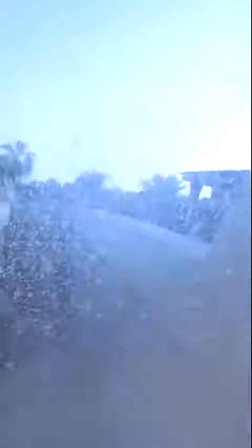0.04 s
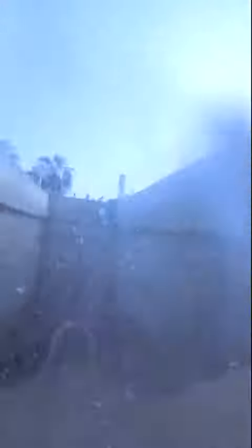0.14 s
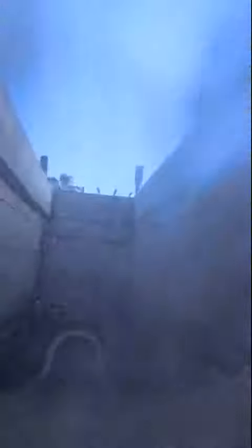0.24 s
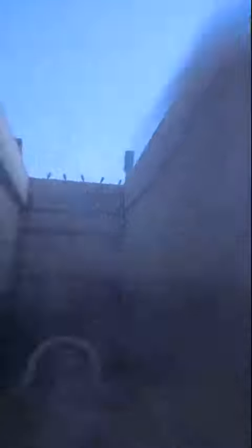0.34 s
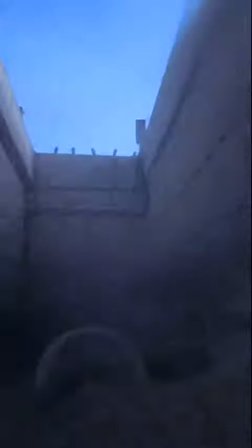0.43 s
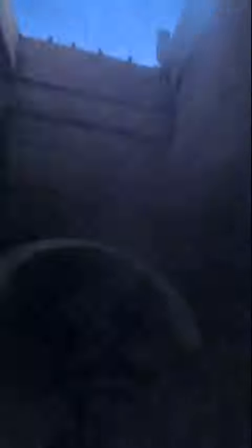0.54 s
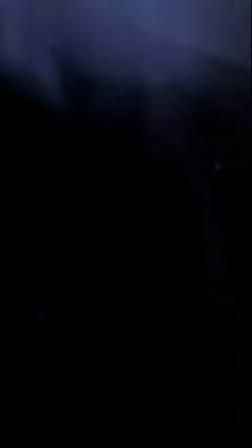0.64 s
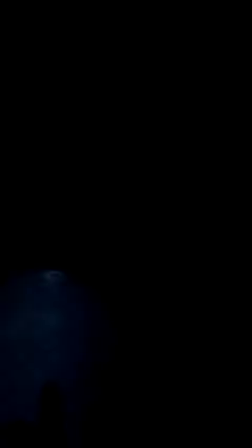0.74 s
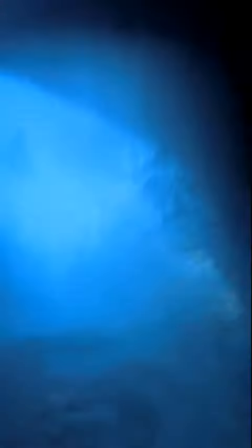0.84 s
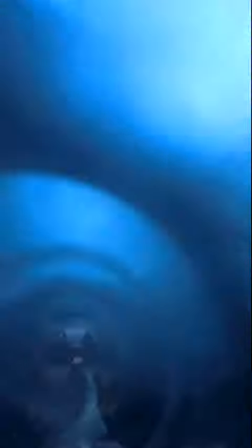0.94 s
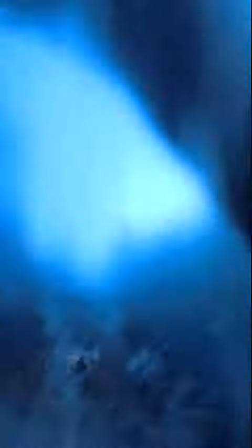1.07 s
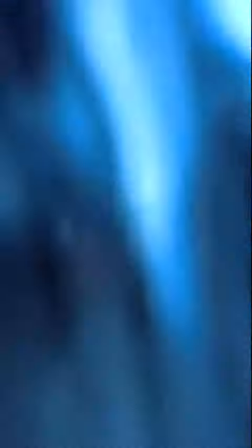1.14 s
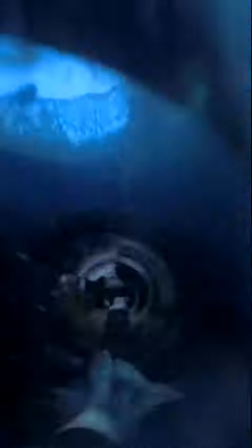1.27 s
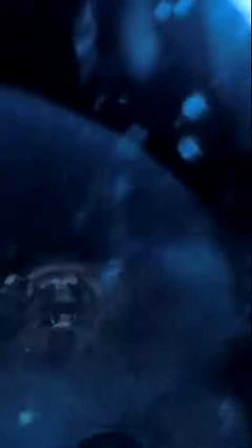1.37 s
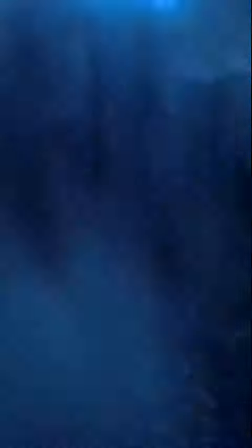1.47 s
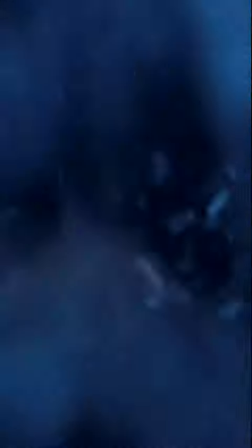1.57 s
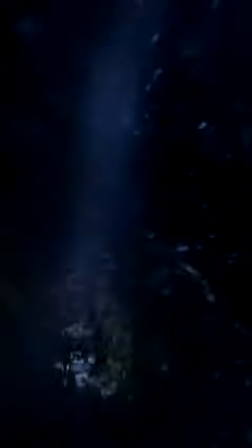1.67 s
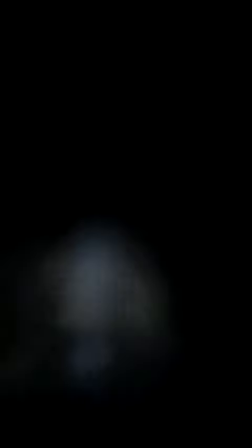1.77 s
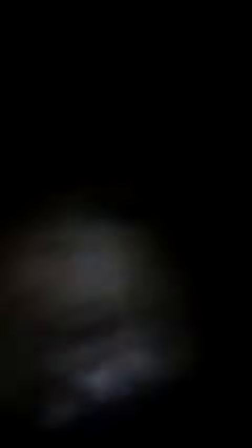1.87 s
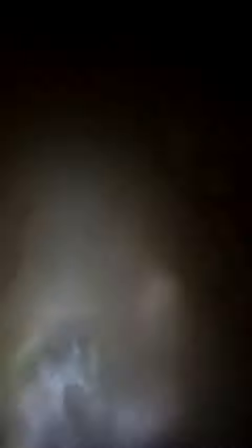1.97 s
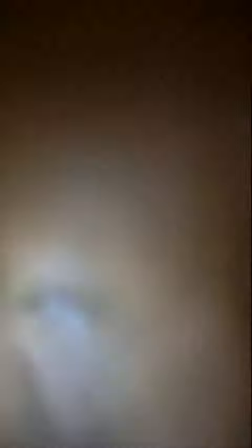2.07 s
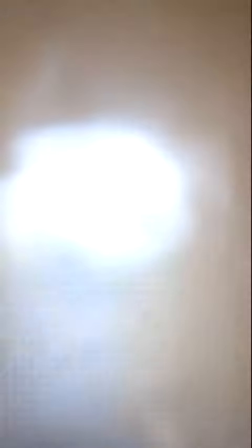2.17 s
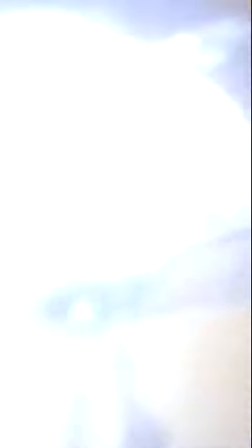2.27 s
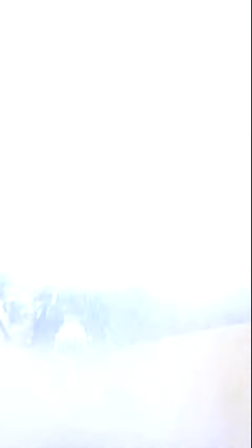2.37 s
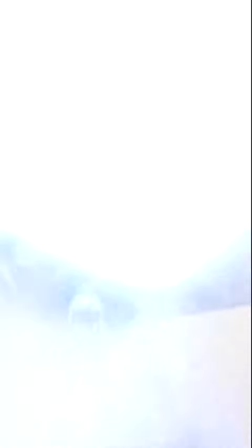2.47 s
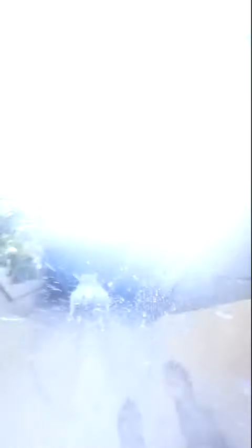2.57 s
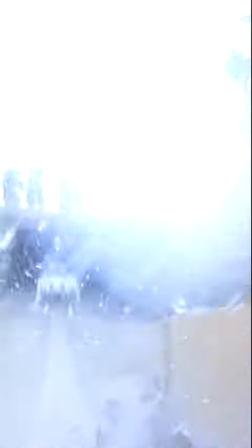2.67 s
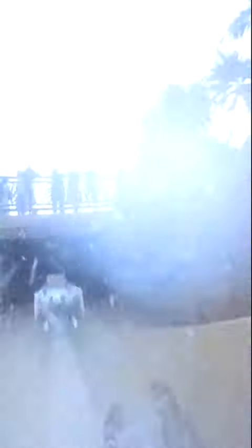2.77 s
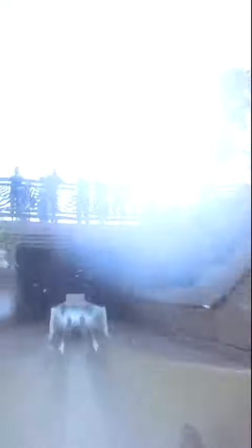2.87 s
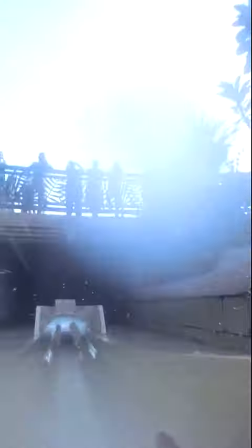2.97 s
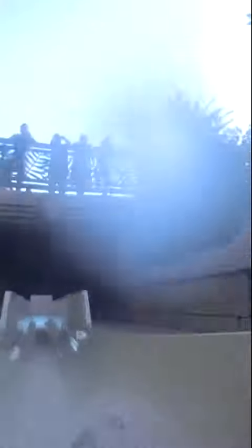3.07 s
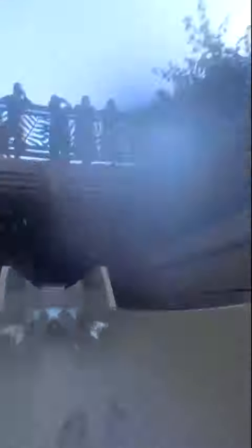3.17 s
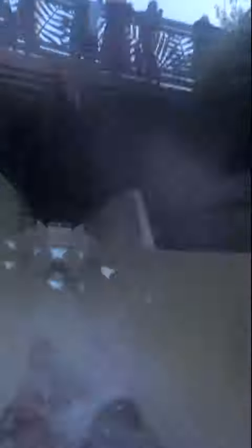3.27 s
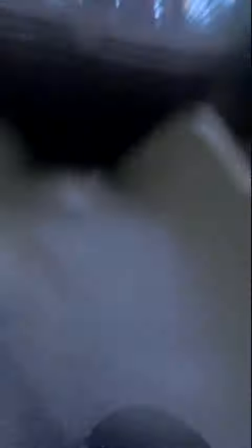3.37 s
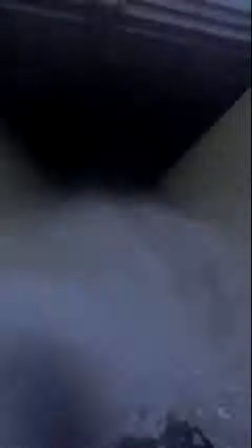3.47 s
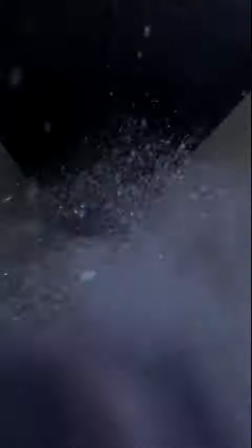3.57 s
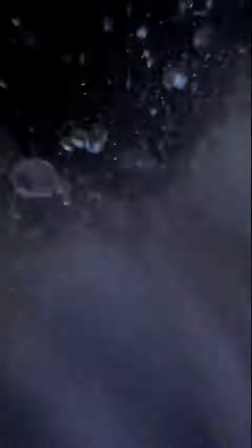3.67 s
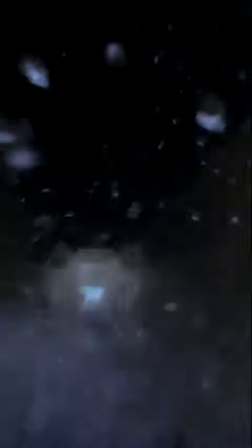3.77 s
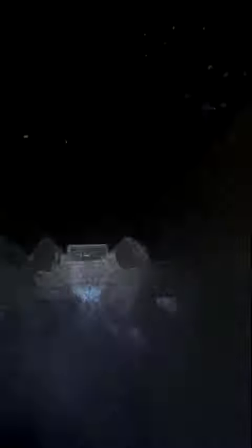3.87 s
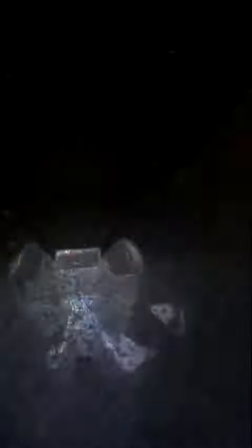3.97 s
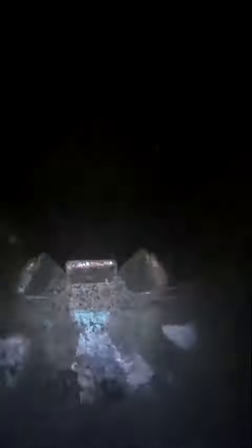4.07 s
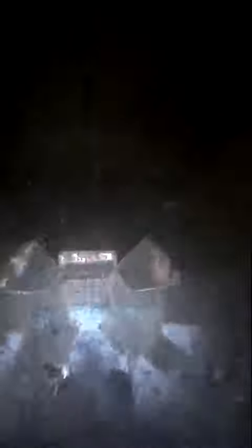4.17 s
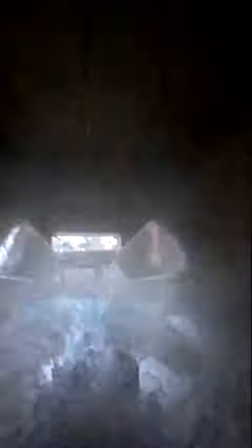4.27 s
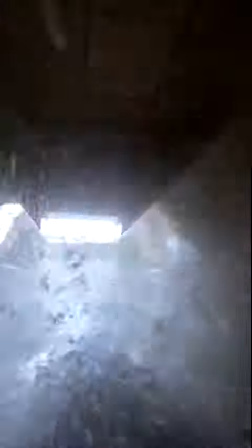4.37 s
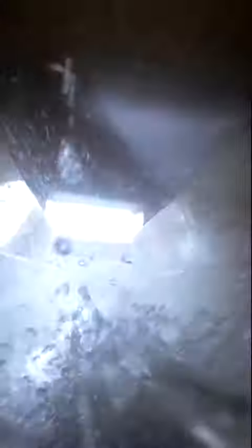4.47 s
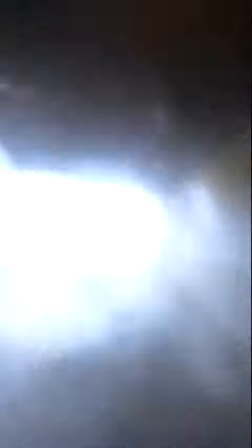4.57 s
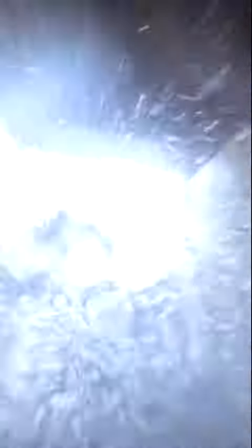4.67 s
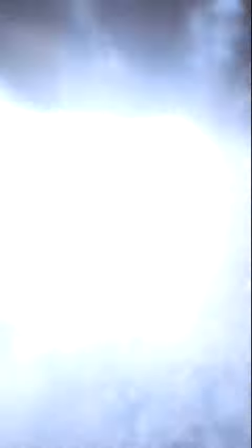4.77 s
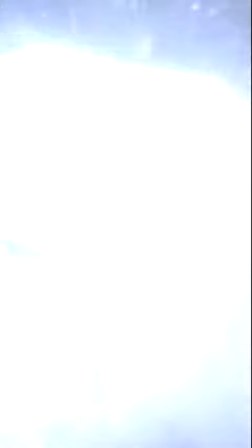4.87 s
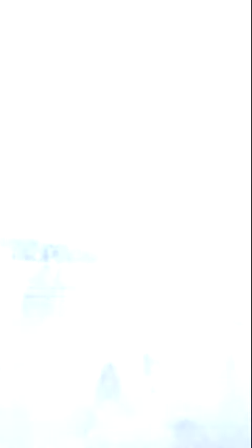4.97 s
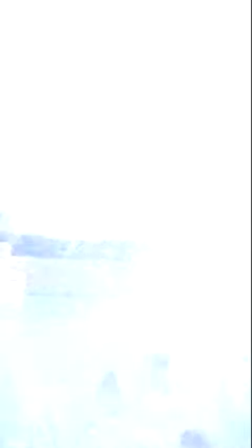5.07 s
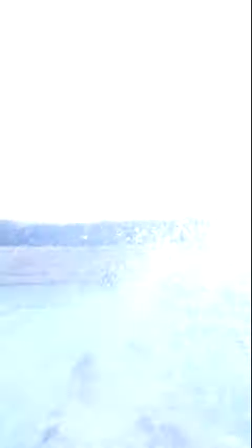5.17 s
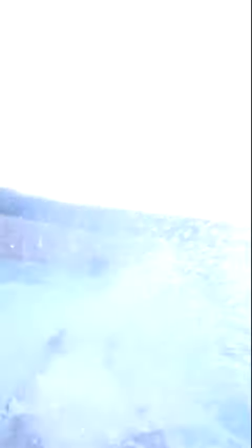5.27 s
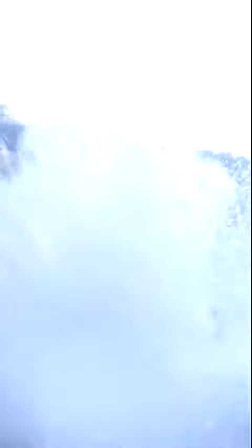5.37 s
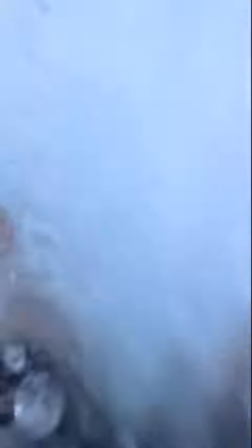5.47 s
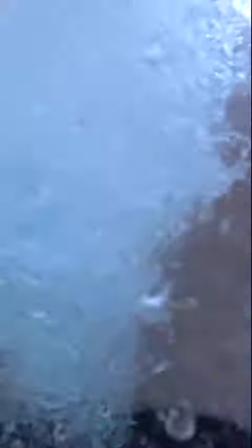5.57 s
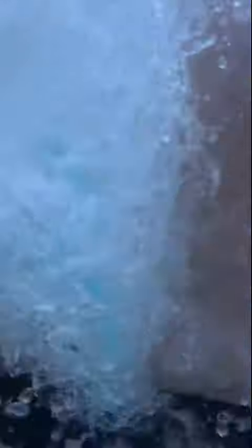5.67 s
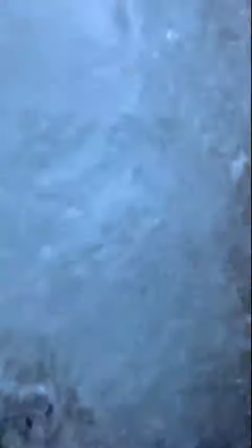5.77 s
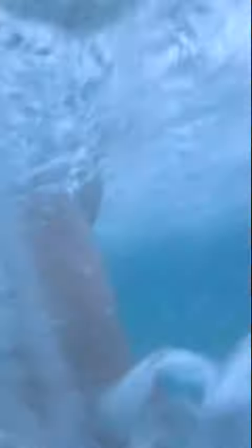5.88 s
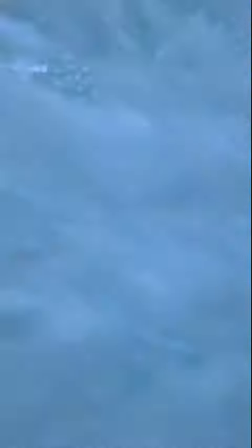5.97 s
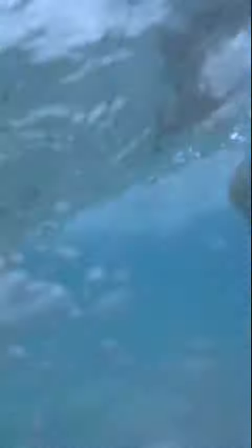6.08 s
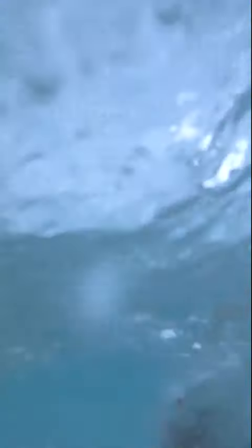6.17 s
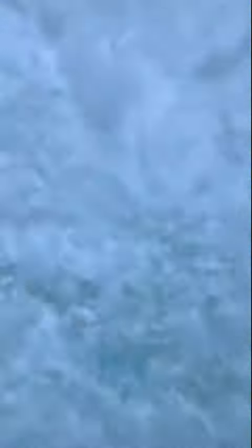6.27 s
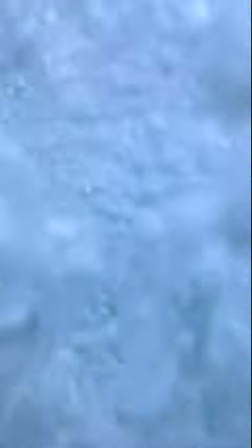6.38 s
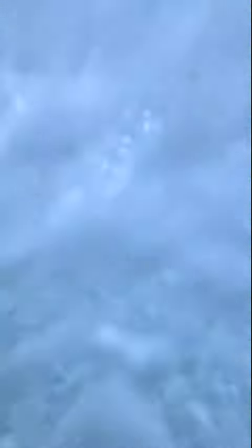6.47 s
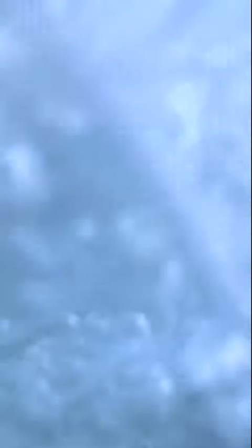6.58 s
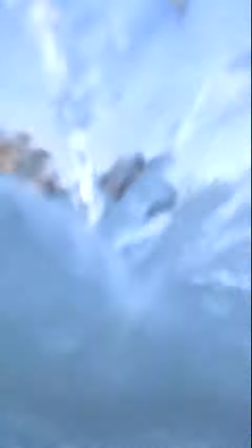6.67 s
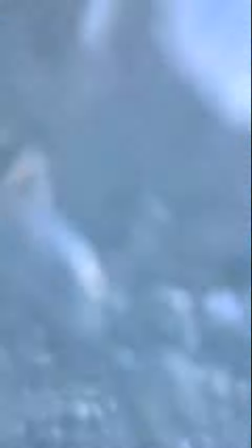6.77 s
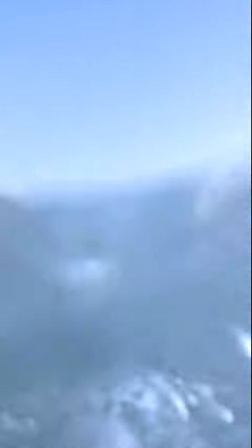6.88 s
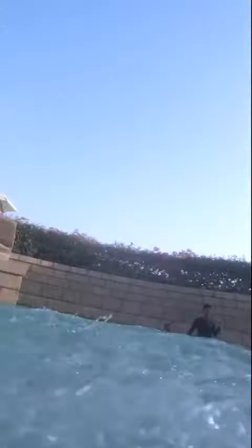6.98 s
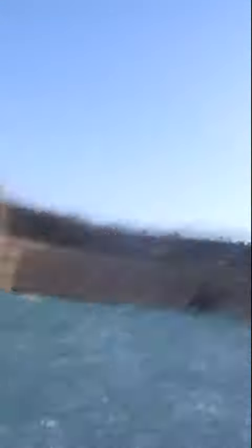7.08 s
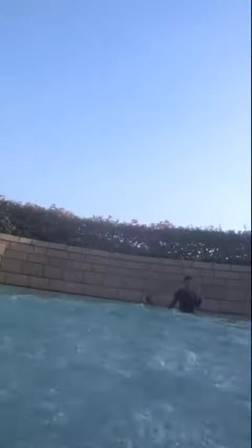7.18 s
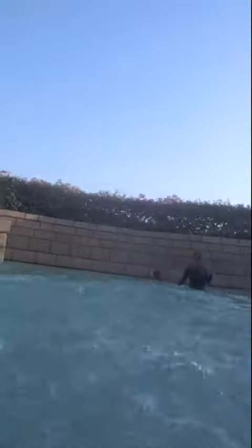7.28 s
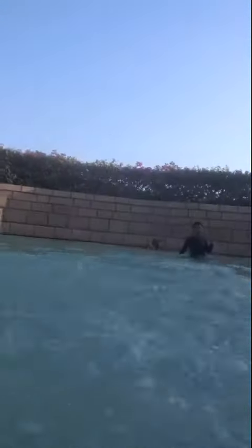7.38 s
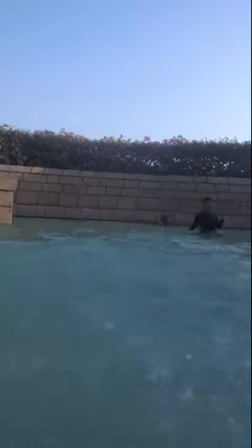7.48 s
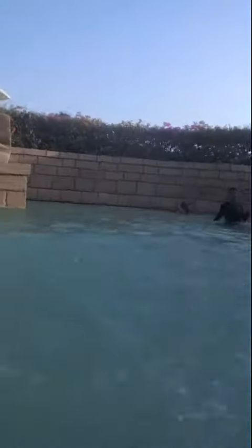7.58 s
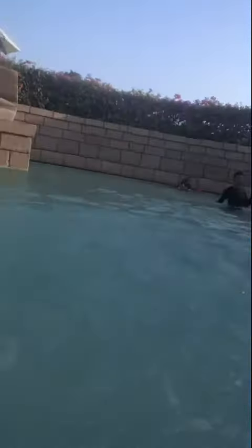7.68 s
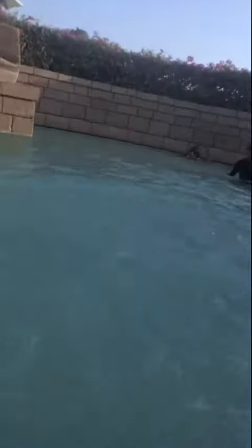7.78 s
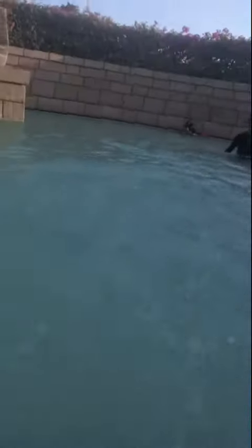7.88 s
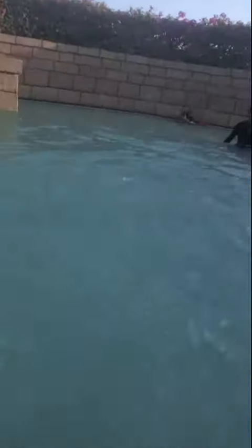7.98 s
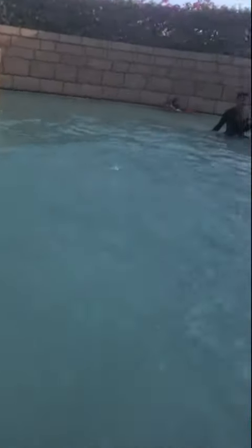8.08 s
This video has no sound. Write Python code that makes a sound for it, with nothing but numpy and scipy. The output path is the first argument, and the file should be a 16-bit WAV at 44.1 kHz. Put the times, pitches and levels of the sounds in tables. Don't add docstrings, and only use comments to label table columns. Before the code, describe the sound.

Very close, a cased phone microphone is pelted by water on a fast slide: roaring rush, hissing spray, dull thumps and sharp ticks in uneven bursts. The water eases on a flatter stretch, though big drops still knock. Then a splash cuts into booming, gurgling bubbles underwater, fading until the phone surfaces to very quiet lapping, fizz and small plops.

```python
import sys
import numpy as np
from scipy import signal
from scipy.fft import rfft, irfft, next_fast_len
from scipy.io import wavfile
from scipy.ndimage import map_coordinates

SR = 44100
rng = np.random.default_rng(int(sys.argv[2]) if len(sys.argv) > 2 else 0)


def unload_wav(signal):
    wavfile.write(
        sys.argv[1],
        SR,
        np.round(np.clip(np.atleast_2d(signal).T, -1, 1) * 32767).astype(np.int16),
    )


def volts_from_db(level):
    exponent = np.asarray(level, float) / 20
    return 10 ** exponent


N = 358091


def unit(x):
    return x / np.sqrt(np.mean(x ** 2) + 1e-20)


def curves(rows):
    s, *columns = np.transpose(rows)
    t = np.arange(N) / SR
    return [np.interp(t, s, column, left=-150, right=-150) for column in columns]


def wobble(rate):
    knots = rng.standard_normal(int(N * rate / SR) + 4)
    return map_coordinates(knots, [np.arange(N) * rate / SR])


def coloured(x, spectrum):
    pitch_hz, level_db = np.transpose(spectrum)
    hz = np.fft.rfftfreq(8192, 1 / SR)
    gain = volts_from_db(np.interp(np.log(hz + 1), np.log(pitch_hz), level_db))
    cepstrum = irfft(np.log(gain))
    cepstrum[1:4096] *= 2
    cepstrum[4097:] = 0
    return signal.fftconvolve(x, irfft(np.exp(rfft(cepstrum))))[:N]


def rings(s, size, hz, cycles, attack, glide, count):
    t = np.arange(count) / SR
    turns = hz[:, None] * t
    bend = turns * (1 + glide * np.tanh(turns / 2))
    fade = np.exp(-turns / cycles) * (1 - np.exp(-turns / attack))
    shape = np.cos(2 * np.pi * bend) * fade
    at = np.round(s * SR).astype(int)[:, None] + np.arange(count)
    return np.bincount(at.ravel(), (size[:, None] * shape).ravel(), N + count + SR)[:N]


def droplets(count, spread_db):
    row = rng.random((count, 2))
    excess = np.minimum(-np.log(1 - row[:, 1]), 4)
    return unit(np.bincount((row[:, 0] * N).astype(int), volts_from_db(spread_db * excess), N))


def shower(spectrum, drops, share, lumpy_db, lump_rate):
    noise = volts_from_db(lumpy_db * wobble(lump_rate)) * rng.standard_normal(N)
    share = np.clip(share, 0, 1)
    mix = np.sqrt(share) * unit(drops) + np.sqrt(1 - share) * unit(noise)
    return unit(coloured(mix, spectrum))


def bubbles(count, mid_hz, spread, cycles, spread_db, size):
    row, pitch = rng.random((count, 2)), rng.standard_normal(count)
    hz = np.clip(mid_hz * np.exp(spread * pitch), 40, 12000)
    excess = np.minimum(-np.log(1 - row[:, 1]), 4)
    loudness = volts_from_db(spread_db * excess)
    return unit(rings(row[:, 0] * N / SR, loudness, hz, cycles, attack=0.34, glide=0.062, count=size))


def strays(level_db, count, spread_db):
    calm_from_s = 5.45
    row = rng.random((count, 2))
    odds = np.cumsum(volts_from_db(0.6 * level_db) * (np.arange(N) < calm_from_s * SR))
    at = np.interp(row[:, 0] * odds[-1], odds, np.arange(N)).astype(int)
    return at / SR, level_db[at] + spread_db * np.minimum(-np.log(1 - row[:, 1]), 3)


# [start_s, spray_db on the membrane, drumming_db on the case]
SLIDE_WATER = [(0, -30, -31), (.15, -36.5, -38), (.41, -40, -43), (.64, -38.5, -37.5), (.81, -28, -37.5),
               (1.12, -29, -27), (1.4, -35, -30), (1.7, -39, -31.5), (2.16, -39.5, -37), (2.44, -35, -38.5),
               (2.77, -44.5, -41), (3.1, -49.5, -51.5), (3.27, -36, -45), (3.66, -47, -38.5),
               (3.76, -38, -34), (3.95, -38, -38), (4.35, -40, -40), (4.92, -41, -34), (5.27, -42, -43),
               (5.73, -41.5, -44)]
# [start_s, spray_db, drumming_db]
POOL_ENTRY = [
    (5.81, -31, -27),
    (5.855, -26.5, -33.5),
    (5.875, -30, -41),
    (5.9, -51, -39),
    (5.93, -55, -38.5),
]
# [middle_s, change_db, length_s]
SPRAY_SHEETS = [(1.257, 7, .04), (1.212, -4, .025), (1.397, -8, .022), (1.419, 12, .01), (1.436, 3, .015),
                (1.484, 16, .03), (1.596, 7, .05), (1.897, 4, .08), (2.085, 9, .05), (2.6, -4, .06),
                (2.894, 4.5, .06), (3.577, 4, .03), (3.629, -3, .03), (3.688, -5, .035), (4.429, 2, .05),
                (4.551, -2.5, .06), (4.694, 3, .04), (5.836, 2, 0.0047), (5.862, 16, 0.0027)]


def water_levels():
    spray_db, drum_db = curves(SLIDE_WATER + POOL_ENTRY)
    t = np.arange(N) / SR
    sheets_db = sum(db * np.exp(-((t - s) / length) ** 2) for s, db, length in SPRAY_SHEETS)
    return spray_db + sheets_db, drum_db + 0.34 * sheets_db


# [start_s, buffet_db]
AIR_RUSH = [
    (0, -36.5),
    (.41, -43),
    (.85, -30),
    (1.5, -43),
    (2.2, -38.5),
    (2.45, -58),
    (4.3, -53),
    (5.72, -54),
    (5.81, -33),
]
# [pitch_hz, level_db]
BUFFET_TONE = [(20, -20), (45, -5.5), (95, -1.5), (150, -8.5), (300, -43), (1000, -100)]
# [pitch_hz, level_db]
RUMBLE_TONE = [(60, -14), (150, -1.5), (260, 0.5), (450, -4), (900, -12.5), (2000, -28.5), (6000, -107.5)]
# [pitch_hz, level_db]
PATTER_TONE = [(150, -4.5), (400, -4), (700, -0.5), (1500, -3.5), (2600, -5), (3700, -18), (5000, -36),
               (9000, -41.5)]
# [pitch_hz, level_db]
PORT_TONE = [(2500, -11), (4000, -6.5), (5200, -2.5), (6500, 4.5), (7700, 4), (10400, -1.5), (12000, -12),
             (15500, -22.5)]


def ride(spray_db, drum_db):
    mean_spray_db = -34.5
    hiss_db = mean_spray_db + 0.92 * (spray_db - mean_spray_db) - 2.5
    buffet_db, = curves(AIR_RUSH + [(5.93, -23)])
    surge = wobble(30)
    spray = droplets(count=4000, spread_db=4.5)
    specks = bubbles(count=2500, mid_hz=3190, spread=0.47, cycles=1.0, spread_db=2.5, size=150)
    gusts = droplets(count=300, spread_db=1.5)
    buffet = shower(BUFFET_TONE, gusts, share=0.38, lumpy_db=5, lump_rate=10)
    drumming = droplets(count=1500, spread_db=2.5)
    rumble = shower(RUMBLE_TONE, drumming, share=0.35, lumpy_db=3, lump_rate=40)
    membrane_drops = spray + 0.7 * droplets(count=2000, spread_db=4)
    patter = shower(PATTER_TONE, membrane_drops, share=0.6, lumpy_db=3, lump_rate=60)
    port_drops = spray + 0.7 * droplets(count=3000, spread_db=4)
    hiss = shower(PORT_TONE, port_drops, share=0.6, lumpy_db=1.8, lump_rate=90)
    low = volts_from_db(buffet_db) * buffet + volts_from_db(drum_db + 1.4 * surge) * rumble
    high = volts_from_db(spray_db - 2.5) * (patter + 0.34 * specks) + volts_from_db(hiss_db - 0.5) * hiss
    return low + volts_from_db(1.2 * surge) * high


# [start_s, peak_db, membrane pitch_hz, port_ring_db]
MEMBRANE_DROPS = [(0.012, -11, 210, -11.5), (0.0357, -12.5, 338, -30), (0.0745, -4.5, 359, -10.5),
                  (0.1093, -14.5, 195, -12), (0.133, -10, 302, -14), (.2372, -4, 337, -5),
                  (0.3392, -19, 223, -7), (0.4701, -18.5, 443, -12), (0.6874, -19.5, 123, -31),
                  (.878, -14, 320, -4.5), (1.052, -14, 395, -3), (1.102, -5.5, 485, -11.5),
                  (1.1135, -10.5, 156, -3), (1.1195, -3, 365, -5), (1.15, -14.5, 258, -7.5),
                  (1.365, -9, 440, -16), (1.42, -11, 334, -17), (1.464, -9, 284, -9.5),
                  (1.4765, -6.5, 397, -15.5), (1.483, -2.5, 291, -9), (1.4954, -2.5, 467, -4),
                  (1.5218, -8, 340, -16), (1.5355, -11.5, 196, -24.5), (1.575, -14, 256, -21),
                  (1.5968, -17, 170, -19.5), (1.7604, -18.5, 194, -31), (2.015, -14.5, 240, -25.5),
                  (2.0225, -11, 189, -33), (2.0747, -8.5, 423, -24), (2.1374, -13.5, 276, -10.5),
                  (2.6926, -23.5, 252, -31), (2.8781, -5.5, 310, -12.5), (2.9849, -20.5, 370, -16.5),
              (3.3032, -8, 215, -10), (3.3181, -16, 403, -10.5), (3.3758, -19, 320, -19),
              (3.5839, -6, 216, -3.5), (3.601, -10.5, 186, -23), (3.741, -7.5, 124, -15),
              (3.774, -15.5, 213, -10), (3.8075, -6.5, 128, -24), (3.8211, -7, 171, -15.5),
              (4.0242, -13, 290, -27), (4.065, -18, 171, -15), (4.1682, -18.5, 388, -17.5),
              (4.1832, -15, 332, -16), (4.22, -10, 297, -13.5), (4.277, -11, 182, -19.5),
              (4.4125, -10.5, 324, -17), (4.4384, -10, 292, -15.5), (4.6851, -7, 177, -24.5),
              (4.6975, -7, 246, -15), (4.7578, -12, 338, -8.5), (4.794, -13, 155, -34),
              (4.8015, -9, 237, -13), (4.912, -15, 325, -20), (5.0444, -12.5, 297, -12),
              (5.1284, -17.5, 370, -21.5), (5.393, -17.5, 296, -27), (5.4299, -9, 176, -13.5),
                  (3.6148, -17, 292, -28), (3.662, -18.5, 189, -35), (4.453, -25.5, 85.4, -35),
               (4.524, -26, 84, -35), (5.737, -20.5, 79, -20), (5.8005, -25, 144, -31),
               (5.8348, -5.5, 300, -23), (5.861, -12.5, 106, -15), (5.868, -7, 112, -16.5),
               (5.887, -21.5, 107, -20), (5.9154, -13, 103, -37),
                  (0.042, -15, 380, -24), (0.0717, -8, 400, -9.5), (0.0781, -10.5, 450, -16),
                 (.087, -16.5, 400, -21.5), (.096, -17, 400, -22), (4.301, -22.5, 350, -27),
                 (4.313, -16, 260, -28), (4.329, -18.5, 280, -27), (4.58, -22, 300, -29),
                 (4.6, -22, 260, -27), (1.086, -17.5, 400, -18), (1.127, -15, 400, -15.5),
                 (1.488, -9, 400, -11), (2.062, -16, 450, -21), (2.068, -17, 400, -20),
                 (.651, -19, 295, -23), (1.68, -19, 353, -27), (1.742, -14, 213, -30),
                 (1.768, -15, 188, -26), (1.835, -26, 190, -36.5), (1.873, -30, 300, -23.5),
                 (1.888, -18.5, 198, -24.5), (2.046, -24.5, 417, -27.5), (2.339, -19, 460, -25),
                 (2.508, -21, 337, -23), (2.535, -22, 328, -26), (2.573, -24.5, 400, -32),
                 (2.591, -20, 302, -30), (2.626, -25, 450, -30), (2.686, -16, 410, -29.5),
                 (2.797, -32, 460, -27), (3.22, -27.5, 458, -19), (3.695, -20.5, 354, -25),
                 (3.853, -19, 353, -14), (4.114, -21.5, 553, -26), (4.131, -21.5, 500, -26),
                 (4.198, -20, 330, -32), (4.377, -21.5, 483, -30), (4.471, -17.5, 300, -39),
                 (4.55, -18.5, 493, -15), (4.665, -22, 550, -15.5), (4.736, -19, 450, -31),
                 (4.825, -27, 400, -30), (4.859, -25, 500, -28), (4.882, -19.5, 520, -21),
                 (4.937, -21.5, 400, -31), (4.968, -20, 560, -26), (5.009, -21, 603, -20),
                 (5.08, -18, 400, -24), (5.115, -21, 503, -28), (5.191, -34, 500, -39),
                 (5.416, -17, 300, -30), (5.466, -25, 396, -31)]
ALL_DROPS = MEMBRANE_DROPS


def thumps(drum_db):
    s, db, hz, _ = np.transpose(ALL_DROPS)
    chance = rng.standard_normal((len(s), 3))
    stray_s, stray_db = strays(drum_db, count=45, spread_db=5.0)
    stray_hz = 210 * np.exp(0.42 * rng.standard_normal(len(stray_s)))
    trail_s = s + 0.014 * np.exp(0.3 * chance[:, 0])
    trail_db = db - 20 - 12.5 * np.log2(hz / 250) + 2.5 * chance[:, 1]
    trail_hz = hz * np.exp(0.25 * chance[:, 2])
    s = np.r_[s + 0.0003, trail_s, stray_s]
    db = np.r_[db, trail_db, stray_db + 3.5]
    hz = np.r_[hz, trail_hz, stray_hz]
    lowness = 300 / hz[:, None]
    cycles = 0.53 * lowness ** 0.3
    attack = 0.075 * lowness ** 0.98
    swing = rings(s, volts_from_db(db + 6.5), hz, cycles, attack, glide=-0.17, count=2400)
    hits = np.bincount((s * SR).astype(int), volts_from_db(db), N)
    burst = signal.lfilter([1], [1, -np.exp(-1 / (0.003 * SR))], hits)
    fine_drops = droplets(count=30000, spread_db=3)
    splatter = shower(PATTER_TONE, fine_drops, share=0.7, lumpy_db=1.5, lump_rate=200)
    return swing + volts_from_db(-18) * burst * splatter


# [start_s, port_ring_db, push_db]
SHARP_DROPS = [(.0583, -10, -30), (.139, -13, -20), (.1849, -25, -13), (.2032, -16.7, -22.6),
               (.3469, -12.4, -18.7), (.4605, -12.5, -23), (.5328, -16, -20), (.5746, -20, -19),
               (.7331, -9.4, -15.8), (.7483, -12.7, -19.6), (.8045, -8.2, -16.5), (.8166, -11, -26),
               (.8358, -9, -14), (.927, -6.4, -12.5), (.9529, -10, -28), (.9914, -8, -26),
               (1.0095, -8, -17), (1.0679, -9.3, -16), (1.0787, -10, -18), (1.2235, -10.7, -17),
               (1.2418, -13, -13), (1.2554, -4.7, -20.5), (1.4172, -23, -12.5), (1.479, -6.5, -10),
               (2.9566, -17, -35), (3.3428, -15, -22.7), (3.5277, -15, -18), (3.9626, -14, -22.7),
               (4.7058, -15, -21), (5.1545, -19, -20.6)]


def ticks(spray_db):
    s, ring_db, push_db = np.transpose(SHARP_DROPS) + [[0], [1.5], [3]]
    heavy_s, heavy_db, hz, heavy_ring_db = np.transpose(ALL_DROPS)
    heavy_push_db = heavy_db - 14.5 + 13.5 * np.log2(hz / 320)
    stray_s, stray_db = strays(np.minimum(spray_db, -28), count=170, spread_db=3.0)
    stray_db = stray_db + 10.5
    stray_push_db = stray_db - 2.5 + 3 * rng.standard_normal(len(stray_s))
    s = np.r_[s, heavy_s, stray_s]
    ring_db = np.r_[ring_db, heavy_ring_db, stray_db]
    push_db = np.r_[push_db, heavy_push_db, stray_push_db]
    chance = rng.standard_normal((len(s), 2))
    ring_hz = 7500 * np.exp(0.11 * chance[:, 0])
    push_hz = 1600 * np.exp(0.25 * chance[:, 1])
    click_hz = 4000 * np.exp(0.38 * chance[:, 0])
    ring = rings(s, volts_from_db(ring_db + 3.5), ring_hz, cycles=1.4, attack=0.22, glide=0, count=200)
    push = rings(s, volts_from_db(push_db + 4.5), push_hz, cycles=0.7, attack=0.08, glide=-0.15, count=300)
    click = rings(s, volts_from_db((ring_db + push_db) / 2), click_hz, cycles=0.65, attack=0.18, glide=0, count=60)
    return ring + push + click


# [start_s, peak_db, pitch_hz]
BURSTING_DROPS = [(.185, -11, 805), (.197, -15, 1500), (.271, -24, 1200), (0.28, -14, 1990),
                  (.303, -20, 2470), (0.514, -29, 1000), (.521, -25, 3000), (0.573, -17, 2220),
                  (.619, -33, 950), (2.294, -23, 1340), (3.743, -15, 3860), (3.961, -21, 895),
                  (4.163, -22.5, 1200), (1.242, -18, 1500), (1.4165, -7, 880), (4.683, -16.5, 700),
                  (5.154, -22.5, 800), (5.86, -3, 4300), (5.8617, -4, 4700), (5.863, -8, 3930),
                  (5.889, -22, 3500), (6.559, -20, 1300)]


def pops():
    s, db, hz = np.transpose(BURSTING_DROPS)
    return rings(s, volts_from_db(db + 2), hz, cycles=1.04, attack=0.081, glide=0.044, count=600)


# [start_s, peak_db, pitch_hz]
CASE_SLOPS = [(0.734, -23, 80), (1.3, -26, 80), (1.8, -29, 80), (3.312, -20, 80.4), (3.577, -7.5, 85),
              (3.734, -14, 80), (3.814, -16.5, 91.5), (4.05, -39, 80), (4.28, -24, 80), (4.691, -13, 85),
              (4.79, -19, 80), (5.069, -25.5, 80), (5.43, -17, 80.6), (6.95, -35, 49.4), (7.05, -42, 45.2),
              (7.25, -48, 60)]


def slops():
    s, db, hz = np.transpose(CASE_SLOPS)
    return rings(s, volts_from_db(db + 3.5), hz, cycles=0.54, attack=0.55, glide=-0.05, count=5000)


# [start_s, boom_db, gurgle_db]
UNDER_WATER = [(5.87, -15, -8), (5.882, -18, -25), (6.1, -14.5, -26.5), (6.37, -13.5, -33.5),
               (6.52, -19, -30.5), (6.56, -18.5, -26.5), (6.636, -25.5, -31), (6.716, -34, -34),
               (6.882, -27, -41.5), (6.95, -48, -48), (7.098, -78, -58.5), (7.12, -74, -62)]
# [pitch_hz, level_db]
BOOM_TONE = [(20, -32.5), (35, 1), (80, -5.5), (170, 11), (230, 3.5), (340, 2), (600, -56.5), (1500, -110)]
# [pitch_hz, level_db]
GURGLE_TONE = [(150, -12), (350, -2.5), (560, -7.5), (750, -19), (1500, -24), (2200, -31), (2900, -47),
               (5000, -100)]


def boom_and_gurgle():
    boom_db, gurgle_db = curves(UNDER_WATER)
    large = bubbles(count=1100, mid_hz=131.0, spread=0.324, cycles=2.0, spread_db=0.5, size=1800)
    cloud = coloured(large, [(30, -9.5), (150, -9), (300, -9.5), (900, -82.0)])
    bumps = droplets(count=600, spread_db=1.5)
    churn = shower(BOOM_TONE, bumps, share=0.15, lumpy_db=1.5, lump_rate=30)
    boom = unit(unit(cloud) + 0.6 * churn)
    blips = droplets(count=1500, spread_db=3.0)
    swirl = shower(GURGLE_TONE, blips, share=0.27, lumpy_db=2.0, lump_rate=40)
    small = bubbles(count=900, mid_hz=661, spread=0.45, cycles=4.3, spread_db=1.0, size=800)
    gurgle = unit(swirl + 0.49 * small)
    return volts_from_db(boom_db) * boom + volts_from_db(gurgle_db) * gurgle


# [start_s, crackle_db]
TINY_BUBBLES = [(5.88, -44.5), (5.99, -56), (6.07, -49), (6.2, -55.5), (6.33, -66.5), (6.45, -59),
                (6.53, -65), (6.56, -53), (6.6, -67), (6.66, -58.5), (6.71, -60), (6.82, -62), (6.85, -74),
                (6.9, -74)]


def crackle():
    pings = bubbles(count=5000, mid_hz=6300, spread=0.33, cycles=8, spread_db=3, size=250)
    fizz = shower(PORT_TONE, droplets(count=3000, spread_db=4), share=0.45, lumpy_db=3.5, lump_rate=70)
    clumps = volts_from_db(1.5 * wobble(60) + 1.5 * wobble(15))
    level_db, = curves(TINY_BUBBLES)
    return volts_from_db(level_db) * unit(clumps * (pings + 0.8 * fizz))


# [start_s, peak_db, pitch_hz]
BUBBLE_SNAPS = [(5.9712, -38, 3070), (6.044, -44, 3760), (6.075, -22, 8140), (6.1009, -39, 3870),
                (6.1637, -32, 3950), (6.191, -38, 4080), (6.2142, -41, 3210), (6.2596, -47, 3010),
                (6.3134, -39.5, 3480), (6.4012, -37, 4800), (6.4621, -45, 3090), (6.4774, -39, 4100),
                (6.506, -48, 4390), (6.525, -40, 3910), (6.5589, -41, 3600), (6.6272, -38, 5830),
                (6.6706, -48, 6420), (6.734, -41, 5850), (6.7749, -51, 6350), (6.786, -41, 3280),
                (6.823, -28, 6560), (6.8801, -46, 6330),
                (5.931, -38, 11400), (5.948, -33, 9000), (5.963, -39, 10300), (6.046, -28, 9200),
                      (6.068, -38, 9500), (6.111, -40, 8800), (6.16, -38, 9800), (6.196, -40, 7500),
                      (6.261, -35, 8100), (6.262, -44, 5800), (6.277, -43, 7200), (6.364, -46, 7300),
                      (6.402, -40, 9600), (6.463, -44, 8500), (6.479, -37, 6200), (6.488, -48, 9700),
                      (6.507, -41, 7600), (6.526, -36, 7700), (6.526, -40, 5400), (6.561, -38, 7200),
                      (6.564, -32, 10700), (6.581, -43, 7500), (6.594, -38, 8300), (6.635, -38, 5700),
                      (6.751, -37, 8500), (6.751, -45, 10200), (6.823, -35, 10000), (6.861, -44, 2600),
                      (6.861, -50, 6700)]


def snaps():
    s, db, hz = np.transpose(BUBBLE_SNAPS)
    return rings(s, volts_from_db(db - 0.5), hz, cycles=4.4, attack=0.5, glide=0.017, count=400)


# [start_s, lapping_db, fizz_db]
SURFACE = [
    (6.84, -84, -80),
    (7.0, -61.5, -70.5),
    (7.12, -58.5, -68),
    (7.4, -58.5, -64.5),
    (7.65, -48, -57.5),
    (7.8, -48.5, -52.5),
    (7.87, -50.5, -50.5),
    (7.93, -56, -59),
    (8.12, -58, -57.5),
]
# [pitch_hz, level_db]
LAP_TONE = [(30, -7.5), (100, -8), (220, -9.5), (500, -9), (1100, -8.5), (2400, -12.5), (3200, -18.5),
            (4000, -29.5), (6000, -47)]
# [start_s, peak_db, pitch_hz]
SURFACE_PLOPS = [(6.969, -45, 565), (7.02, -43, 620), (7.048, -42.5, 630), (7.079, -43, 581),
                 (7.404, -48, 960), (7.574, -42.5, 970), (7.64, -39.5, 475), (7.69, -47, 750),
                 (7.79, -45, 860), (7.746, -41, 315), (7.837, -45, 600)]


def pool():
    lap_db, fizz_db = curves(SURFACE)
    wash = shower(LAP_TONE, droplets(count=3000, spread_db=2.5), share=0.06, lumpy_db=2.2, lump_rate=40)
    trapped_air = bubbles(count=900, mid_hz=822, spread=0.437, cycles=6.3, spread_db=2.0, size=800)
    lap = unit(wash + 0.54 * trapped_air)
    fizz = shower(PORT_TONE, droplets(count=4000, spread_db=3), share=0.12, lumpy_db=1.5, lump_rate=40)
    s, db, hz = np.transpose(SURFACE_PLOPS)
    plops = rings(s + 0.002, volts_from_db(db + 1.5), hz, cycles=5, attack=0.8, glide=0.06, count=2000)
    return volts_from_db(lap_db) * lap + volts_from_db(fizz_db) * fizz + plops


def scene():
    spray_db, drum_db = water_levels()
    sliding = ride(spray_db, drum_db) + thumps(drum_db) + ticks(spray_db) + pops() + slops()
    under_water = boom_and_gurgle() + crackle() + snaps()
    return (sliding + under_water + pool())[None]


def top_cut(x):
    return signal.sosfilt(signal.butter(12, 16520, fs=SR, output="sos"), x)


def record(dry):
    soft = dry / (1 + np.abs(dry / 0.74) ** 6) ** (1 / 6)
    size = next_fast_len(N)
    hz = np.fft.rfftfreq(size, 1 / SR)
    top_hz = 15700
    top = np.where(hz < top_hz, 1, volts_from_db(-21)) * (hz < top_hz * 1.05)
    bass = hz / np.sqrt(hz ** 2 + 10.0 ** 2)
    treble = 1 / np.sqrt(1 + (hz / 15000) ** 6)
    mix = irfft(rfft(soft, size) * top * bass * treble, size)[..., :N]
    return top_cut(mix)


dry = scene()
out = record(dry)
unload_wav(out)
```